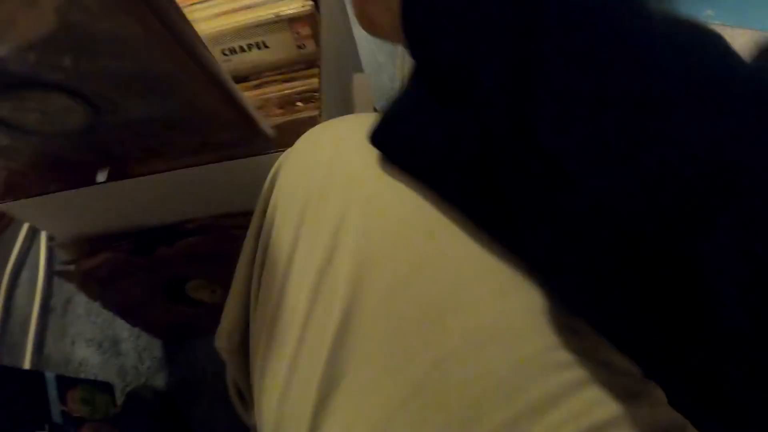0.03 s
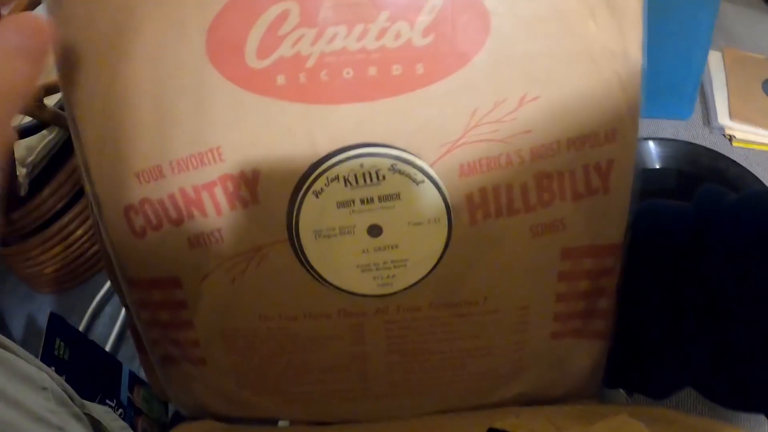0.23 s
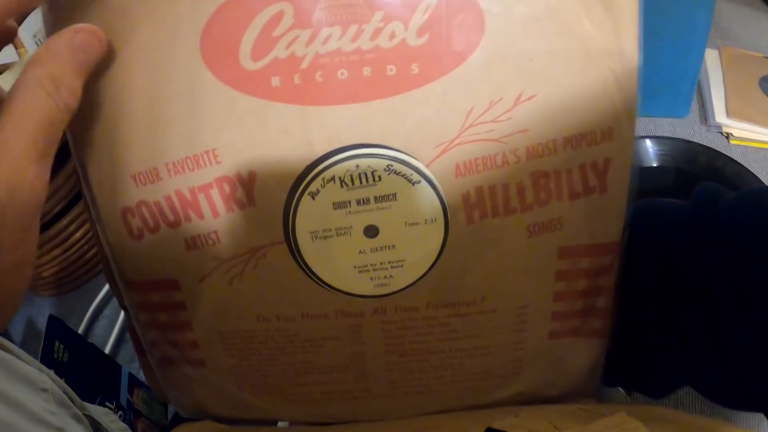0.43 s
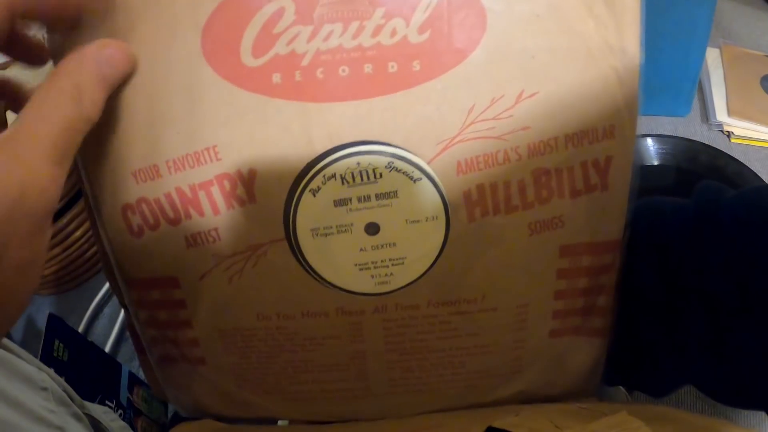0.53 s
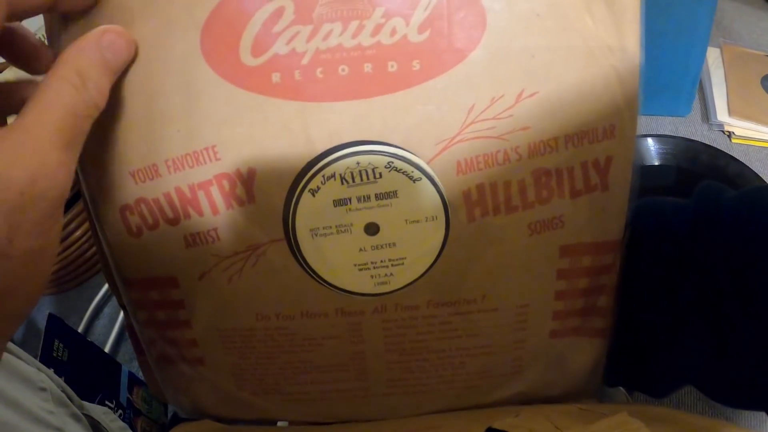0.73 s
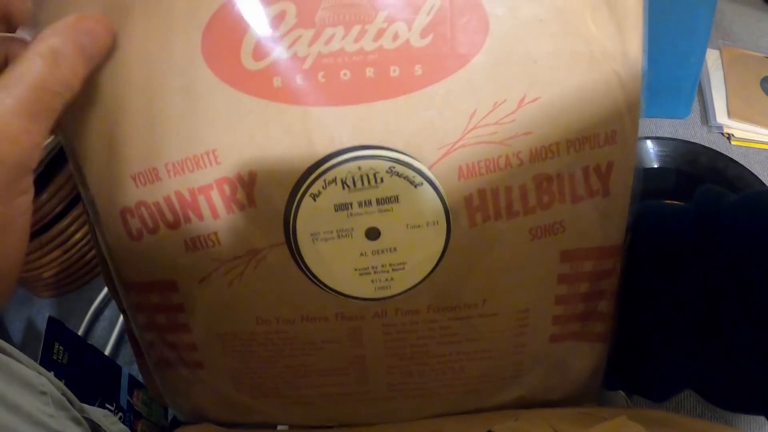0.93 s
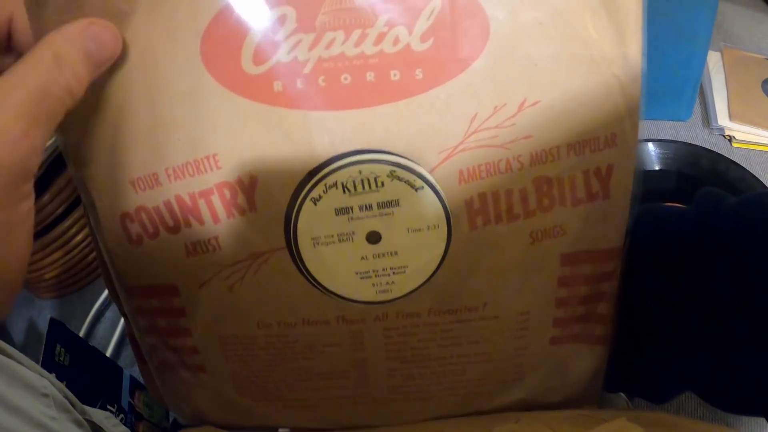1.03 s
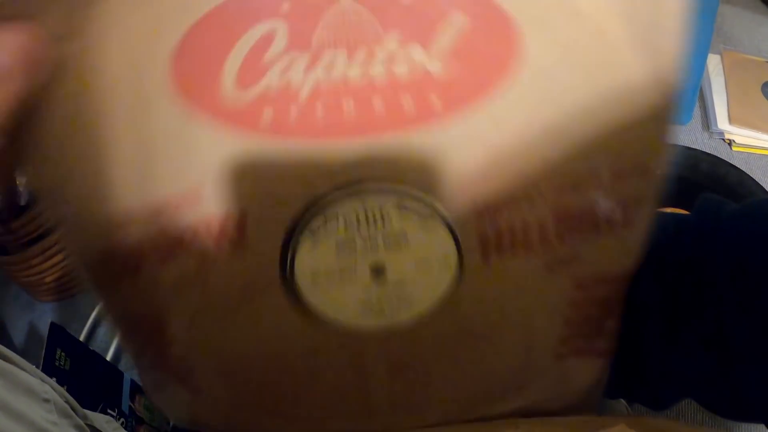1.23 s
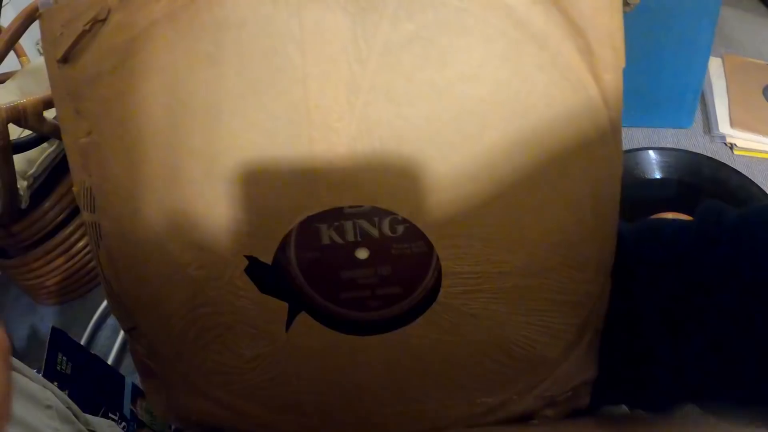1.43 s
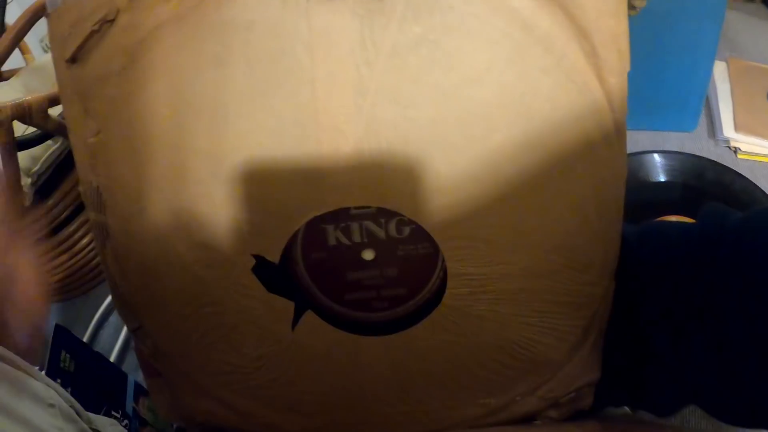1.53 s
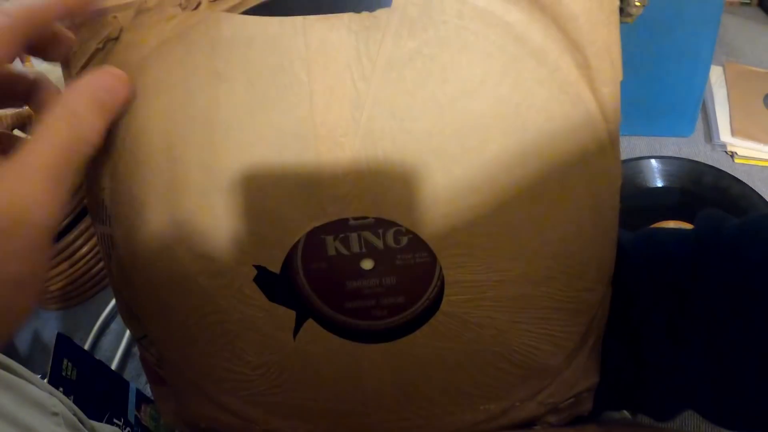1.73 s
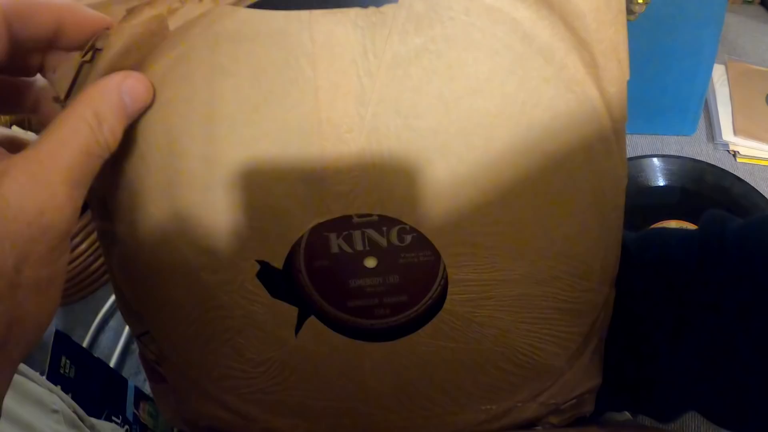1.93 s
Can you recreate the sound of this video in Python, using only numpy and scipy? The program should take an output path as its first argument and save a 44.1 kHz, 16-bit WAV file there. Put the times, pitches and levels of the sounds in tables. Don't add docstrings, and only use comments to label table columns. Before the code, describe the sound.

Paper sleeves being flipped by hand, very close in a quiet room. Dull rustling from the start leads to a deep soft thump at 0.22 s. Faint ticks and crinkles follow, with sharper snaps near 0.5 and 0.77 s. From 1.1 s paper rubs and snaps, swishing loudest at 1.4 s; loose low knocks land at 1.5-1.6 s. After a lull, bright crisp crinkling rises from 1.85 s to the end.

```python
import sys
import numpy as np
from scipy import signal
from scipy.io import wavfile
from scipy.ndimage import uniform_filter1d

SR = 44100
rng = np.random.default_rng(int(sys.argv[2]) if len(sys.argv) > 2 else 0)


def persist_wave(psi):
    counts = np.round(np.clip(psi, -1, 1) * 32767).astype(np.int16)
    wavfile.write(sys.argv[1], SR, np.atleast_2d(counts).T)


def ratio_of_db(decibels):
    return 10 ** (np.asarray(decibels, float) / 20)


N = 88200

# start [s], end [s], first level [dB], last level [dB], brightness [dB].
STROKES = [(-.05, 0.102, -44.5, -53, -20.5), (0.1003, 0.166, -40.5, -38, -7.5),
           (0.15, 0.25, -41.5, -41.5, -8.5), (0.257, 0.34, -55.5, -56, -9), (0.414, 0.54, -62, -58, 0),
           (0.582, 0.614, -60.5, -61.5, 14), (0.631, 0.692, -61, -62.5, 12.5),
           (0.1, 0.134, -51.5, -47.5, 24), (1.839, 1.897, -47.5, -49, 18.5), (1.915, 2.04, -47, -45, 12),
           (0.482, 0.521, -58.5, -53.5, 13), (0.733, 0.781, -42.5, -50, -5), (0.757, 0.97, -55.5, -70.5, 9),
           (0.971, 1.063, -51.5, -52.5, -6.5), (1.073, 1.317, -52, -46, -7), (1.284, 1.398, -45.5, -38, -6),
           (1.387, 1.49, -31.5, -43, -9.5), (1.494, 1.609, -44.5, -39.5, -8.5),
           (1.613, 1.708, -58, -68.5, 4), (1.619, 1.841, -50.5, -54.5, -15.5), (1.766, 1.909, -65, -44, 6),
           (1.912, 1.954, -35, -47.5, 6), (1.96, 2.043, -44, -30, 8.5)]
# frequency [Hz], density [dB per Hz].
RUB_DULL = [(90, -17.5), (200, 2.5), (420, -2), (850, -11), (1300, -8.5), (2000, -13.5), (4500, -36),
            (15500, -105)]
RUB_BRIGHT = [(300, -34.5), (1300, -8.5), (2200, -1.5), (3500, 6), (5000, 3.5), (8300, -11.5), (9500, -15),
              (15500, -36.5)]
RUB_FINE = [(1500, -42), (3000, -7), (5000, 8), (7800, 1.5), (8800, -5.5), (9600, -10.5), (13000, -16),
            (15500, -17)]
GRAIN_BANDS_HZ = [150, 600, 1100, 1900, 3000, 4200, 5800, 7800, 10500, 15500]
# time [s], peak [dB], brightness [dB], length [s].
THUMB_SNAPS = [(.158, -35, 15, 0.0014), (.224, -20.5, -5, 0.0062), (.412, -49, 16, 0.0011),
               (.432, -48, -19, 0.002), (.452, -39, 13, 0.00082), (.470, -48, 3, 0.0006),
               (.509, -23, 14, 0.0061), (.519, -36.5, 2, 0.0013), (.578, -53, -3, 0.0018),
               (.605, -49.5, 7, 0.0045), (.672, -44, 16, 0.0021), (.7385, -36.5, -3, 0.00095),
               (.750, -45, 24, 0.00064), (.767, -18.5, 7, 0.0032), (.778, -33, 16, 0.0025),
               (.852, -44.5, -18, 0.0018), (.907, -37.5, 32, 0.003), (.972, -30.5, 15, 0.00046),
               (.999, -30, 16, 0.0019), (1.021, -42, 7, 0.0016), (1.101, -35.5, -4, 0.0022),
               (1.120, -33, 4.5, 0.0023)]
# time [s], peak [dB], brightness [dB],
# length [s].
FLIP_SNAPS = [(1.1863, -18, 8, 0.0012), (1.207, -26.5, -2, 0.002), (1.237, -31, -5, 0.0011),
              (1.245, -37.5, 6, 0.001), (1.365, -29, 4, 0.0023), (1.3937, -18, -9, 0.0012),
              (1.4044, -24, 4.5, 0.0011), (1.417, -29, 3, 0.0021), (1.43, -39, -2, .0015),
              (1.4904, -23.5, 7, 0.001), (1.584, -29.5, 14, 0.0021), (1.6055, -23.5, 5.5, 0.002),
              (1.855, -29, 27, 0.0007), (1.9198, -22, 18, 0.00062), (1.9627, -22, 22.5, 0.00085),
              (1.98, -27.5, 19, 0.004)]
# frequency [Hz], width [Hz], level [dB].
SHEET_DULL = [(1222, 270, 18.5), (1586, 840, 1), (2090, 520, 10)]
SHEET_BRIGHT = [(2830, 230, -6.5), (4550, 400, -1), (5230, 200, -2), (6200, 1950, 1.5), (8700, 300, -7)]
# time [s], peak [dB], pitch [Hz], width as a share of the pitch [1].
TICKS = [(.17, -34, 3700, 0.27), (.4205, -57, 8000, 0.37), (0.47, -41, 7300, .4), (.4855, -47, 4500, .3),
         (.5385, -47, 4500, .6), (0.578, -40.5, 7000, 0.3), (0.7302, -44, 6000, 0.53),
         (.7378, -36, 4560, 0.69), (0.7507, -36, 8350, 0.26), (.9472, -46.5, 4900, .5),
         (1.156, -57, 4000, .5), (1.1862, -21.5, 3450, 0.28), (1.1852, -27, 2400, 0.26),
         (.9985, -37.5, 3900, 0.22), (.9985, -41, 2740, .2), (.6715, -43, 3440, 0.4),
         (.4115, -48, 6000, 0.32), (1.281, -35, 9500, .6), (1.364, -47, 7150, 0.26), (1.6037, -31, 3980, 1),
         (1.8407, -36, 6000, .5), (1.867, -34, 6950, 0.31), (1.871, -28, 7200, 0.15),
         (1.8994, -31.5, 4000, .6), (1.9204, -30, 5600, 0.59), (1.928, -39, 12000, .5),
         (1.988, -26, 4420, .5), (1.998, -30, 4500, .5)]
# time [s], peak [dB], pitch [Hz], t60 [s].
SLAPS = [(0.1042, -22.5, 672, 0.015), (.131, -30.5, 766, 0.056), (.139, -29, 730, 0.0058),
         (.156, -32.5, 812, 0.044), (.508, -40, 277, 0.042), (0.5062, -29, 4550, 0.017),
         (0.685, -47.5, 444, 0.022), (0.7636, -23.5, 4550, 0.0067), (1.1864, -26, 1170, 0.0098),
         (1.237, -38.5, 436, 0.019), (1.3, -22, 1277, 0.0086), (1.4752, -22, 1690, 0.0048),
         (1.425, -28, 467, 0.025), (1.488, -34, 720, 0.048), (1.922, -37, 422, 0.036),
         (1.977, -36.5, 288, 0.021), (.236, -28.5, 475, 0.058), (.238, -36, 702, 0.054),
         (0.289, -54, 620, 0.027), (1.4, -28, 600, 0.024), (1.418, -33.5, 680, 0.028),
         (1.447, -39.5, 870, 0.023), (.326, -51.5, 664, 0.028), (1.3951, -21.5, 1010, 0.006),
         (1.408, -31.5, 736, 0.026), (1.436, -35, 790, .03)]
# time [s], air push [dB], push pitch [Hz], pile ring [dB], push length [s].
KNOCKS = [(.166, -37, 80.5, -25.5, 0.046), (0.2084, -26, 200, -26.5, 0.018),
          (0.2199, -7, 57.4, -9.5, 0.052), (0.2342, -12.5, 210, -25.5, 0.078),
          (.291, -21, 80.3, -47, 0.051), (0.32, -34, 51, -47, 0.077), (0.511, -42, 45.7, -48, 0.12),
          (0.752, -33.5, 63.7, -37.5, 0.058), (1.394, -53, 59, -25.5, .08), (1.510, -28, 111, -34.5, 0.053),
          (1.5245, -11.5, 97, -31.5, 0.022), (1.5355, -12.5, 51.8, -22, 0.071),
          (1.570, -19, 150, -27.5, 0.042), (1.5835, -14.5, 115, -52, 0.022),
          (1.593, -19.5, 53, -26.5, 0.067), (1.646, -37, 51.7, -39, 0.06), (1.691, -31, 67.6, -57, 0.047),
          (.375, -43, 61.3, -65, 0.048)]
# frequency [Hz], level [dB], t60 [s].
PILE = [(95.4, 1, 0.057), (185, 6.5, 0.052), (243, 3, 0.041), (396, -7.5, 0.092), (527, -0.5, 0.033),
        (986, -10.5, 0.045)]
# time [s], level [dB].
SHAKE = [
    (0, -66.5),
    (.2, -30),
    (.4, -48),
    (.65, -63),
    (.95, -51.5),
    (1.1, -67),
    (1.4, -49.5),
    (1.6, -29.5),
    (1.8, -61.5),
    (2, -77),
]
# frequency [Hz], density [dB per Hz].
SHAKE_TONE = [(15, -11), (65, -3), (120, -10), (250, -21), (500, -48.5)]
# frequency [Hz], density [dB per Hz].
AIR = [(20, -13), (200, -1), (900, -23.5), (1250, -17.5), (2000, -26.5), (8000, -30), (15500, -60)]


def rub():
    rise_s, release_db_per_s, fine_from_db = 0.0036, 890, 13
    t = np.arange(N) / SR
    power = np.zeros((3, N))
    for start, end, first_db, last_db, bright_db in STROKES:
        level_db = np.interp(t, [start, end], [first_db, last_db])
        level_db = level_db - release_db_per_s * np.maximum(t - end, 0)
        envelope = np.clip((t - start) / rise_s, 0, 1) * ratio_of_db(level_db)
        bright = 1 / (1 + ratio_of_db(-2 * bright_db))
        fine = 1 / (1 + ratio_of_db(2 * (fine_from_db - bright_db)))
        power += np.outer([1 - bright, bright - fine, fine], envelope ** 2)
    clump = ratio_of_db(1.8 * wander(0.0096) + 1.4 * wander(0.038))
    coarse = evened(crinkle() * clump)
    small = evened(crinkle() * clump)
    dull_rub = colour(np.sqrt(power[0]) * coarse, RUB_DULL)
    bright_rub = colour(np.sqrt(power[1]) * small, RUB_BRIGHT)
    fine_rub = colour(np.sqrt(power[2]) * small, RUB_FINE)
    return dull_rub + bright_rub + fine_rub


def crinkle():
    grains_per_s, spread_db, clump_db, smooth_share = 700, 3.2, 1.8, .55
    grains = np.zeros(N)
    for lo, hi in zip(GRAIN_BANDS_HZ, GRAIN_BANDS_HZ[1:]):
        hits = (rng.random(N) < grains_per_s / SR) * rng.choice([-1., 1.], N)
        train = hits * ratio_of_db(spread_db * np.minimum(rng.exponential(1, N), 4))
        train = evened(train * ratio_of_db(clump_db * wander(0.0062)))
        band = signal.butter(2, [lo, hi], "band", fs=SR, output="sos")
        grains += signal.sosfilt(band, train)
    hiss = rng.standard_normal(N)
    return np.sqrt(smooth_share) * hiss + np.sqrt(1 - smooth_share) * evened(grains)


def snap(s, peak_db, bright_db, length):
    clicks_per_s, spread_db, lead_s, tail_db, tail_t60_s = 2500, 4.5, .012, -40, .06
    chance, side, size, hiss = rng.random((4, SR // 10))
    t = np.arange(len(chance)) / SR - lead_s
    length = np.clip(length, .0005, .005)
    cracks = (chance < clicks_per_s / SR) * np.sign(side - .5) * ratio_of_db(-spread_db * np.log(size + 0.005))
    buckle = 4 * (np.abs(t) < .5 / SR)
    cracks = (cracks + buckle) * np.exp(-(t / length) ** 2)
    tail = ratio_of_db(tail_db - 60 * t / tail_t60_s) * (hiss - .5) * (t > 0)
    cracks = cracks / np.linalg.norm(cracks) + tail
    cracks = uniform_filter1d(cracks, size=2)
    shift = 0.978 + 0.094 * chance[-9:]
    dull = ring(uniform_filter1d(cracks, size=5), SHEET_DULL, shift)
    bright = ring(cracks, SHEET_BRIGHT, shift[3:])
    sound = dull * ratio_of_db(-bright_db / 2) + bright * ratio_of_db(bright_db / 2)
    return s - lead_s, ratio_of_db(peak_db) * sound / np.abs(sound).max()


def tick(s, peak_db, hz, share):
    t = np.arange(SR // 100) / SR
    fade = np.pi * hz * np.clip(share, .08, .45) * t
    return s, ratio_of_db(peak_db) * np.e * fade * np.exp(-fade) * np.sin(2 * np.pi * hz * t)


def slap(s, peak_db, hz, t60):
    t = np.arange(round(.1 * SR)) / SR
    pair = np.sin(2 * np.pi * hz * t) + 0.082 * np.sin(2 * np.pi * 1.5 * hz * t)
    return s, ratio_of_db(peak_db - 60 * t / t60) * (1 - np.exp(-t / 0.00051)) * pair * 2


def knock(s, push_db, push_hz, ring_db, length, detune):
    push_rise_s, ring_rise_s, sag_per_turn = 0.0022, 0.0038, 0.104
    t = np.arange(SR // 3) / SR
    turns = (1 - np.exp(-sag_per_turn * push_hz * t)) / sag_per_turn
    push = ratio_of_db(push_db - 60 * (t / length) ** 2) * (1 - np.exp(-t / push_rise_s))
    push = push * np.sin(2 * np.pi * turns)
    pile = np.zeros(len(t))
    for (hz, db, t60), ratio in zip(PILE, detune):
        pile += ratio_of_db(db - 60 * t / t60) * np.sin(2 * np.pi * hz * ratio * t)
    return s, -1.5 * push - ratio_of_db(ring_db) * (1 - np.exp(-t / ring_rise_s)) * pile


def shake():
    s, level_db = np.transpose(SHAKE)
    lumps = ratio_of_db(np.interp(np.arange(N) / SR, s, level_db) + 2.5 * wander(.025))
    return lumps * colour(rng.standard_normal(N), SHAKE_TONE)


def room_air():
    return ratio_of_db(-62) * colour(rng.standard_normal(N), AIR)


def evened(x):
    return x / np.sqrt(np.mean(x ** 2) + 1e-20)


def wander(seconds):
    size = max(round(seconds * SR), 1)
    return evened(uniform_filter1d(uniform_filter1d(rng.standard_normal(N), size), size))


def colour(x, points):
    f, db = np.transpose(points)
    hz = np.abs(np.fft.fftfreq(8192, 1 / SR))
    log_gain = np.log(ratio_of_db(np.interp(np.log(hz + 1), np.log(f + 1), db, right=-90)))
    taps = np.fft.ifft(np.exp(np.conj(signal.hilbert(log_gain)))).real[:4096]
    return signal.oaconvolve(x, taps / np.linalg.norm(taps))[:len(x)]


def ring(x, peaks, shift):
    out = np.zeros(len(x))
    for k, (hz, width, db) in enumerate(peaks):
        r = np.exp(-np.pi * width / SR)
        poles = [1, -2 * r * np.cos(2 * np.pi * hz * shift[k] / SR), r * r]
        out += (-1) ** k * ratio_of_db(db) * signal.lfilter([1, 0, -1], poles, x) * np.sqrt(1 - r)
    return out


def add(mix, s, sound):
    part = mix[round(s * SR):][:len(sound)]
    part += sound[:len(part)]


def scene():
    mix = room_air() + shake() + rub()
    detunes = 0.99 + 0.048 * rng.random((30, len(PILE)))
    for row, detune in zip(KNOCKS, detunes):
        add(mix, *knock(*row, detune))
    for source, events in [(slap, SLAPS), (tick, TICKS), (snap, THUMB_SNAPS), (snap, FLIP_SNAPS)]:
        for row in events:
            add(mix, *source(*row))
    return mix[None]


def top_cut(x):
    return signal.sosfilt(signal.butter(12, 15690, fs=SR, output="sos"), x)


def record(dry):
    edge_hz = 15500
    hz = [0, 12500, 14500, edge_hz, edge_hz + 300, SR / 2]
    top = signal.firwin2(255, hz, [1, 1, ratio_of_db(-6.0), ratio_of_db(-9.0), 0, 0], fs=SR)
    mix = signal.oaconvolve(dry, top[None], "same")
    return top_cut(mix)


dry = scene()
out = record(dry)
persist_wave(out)
```